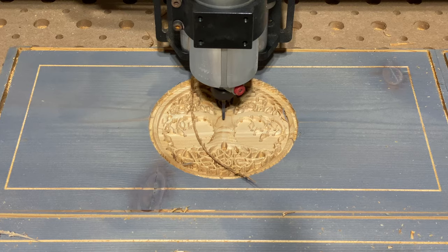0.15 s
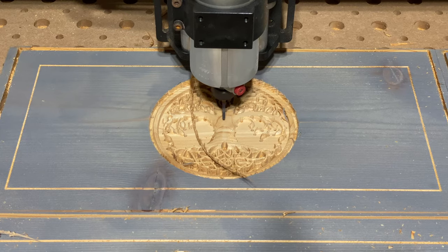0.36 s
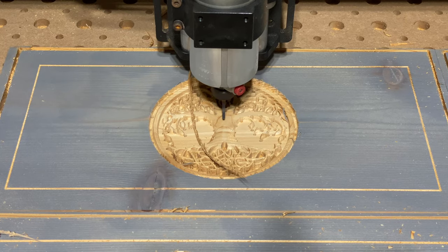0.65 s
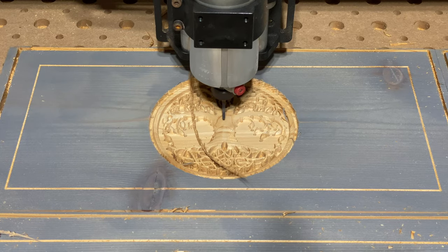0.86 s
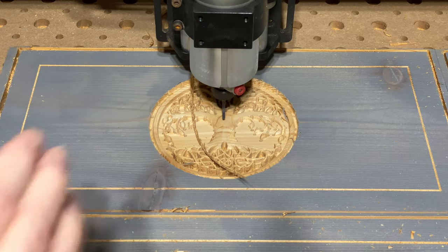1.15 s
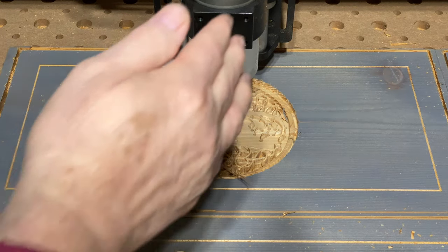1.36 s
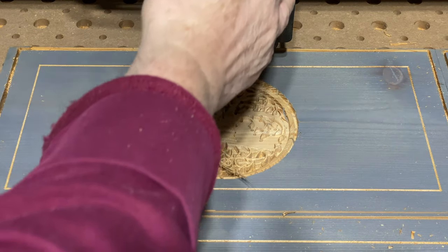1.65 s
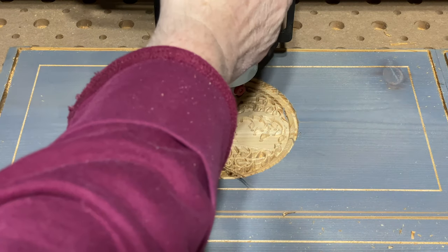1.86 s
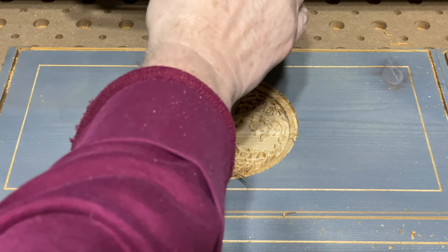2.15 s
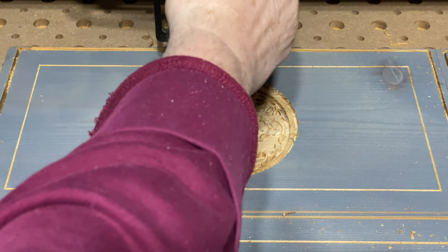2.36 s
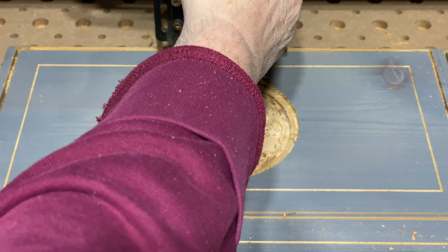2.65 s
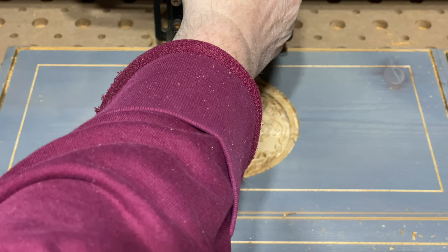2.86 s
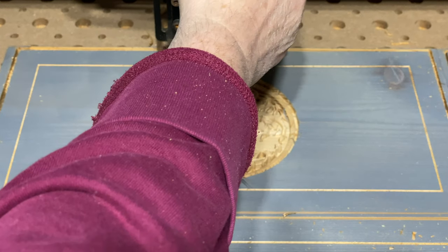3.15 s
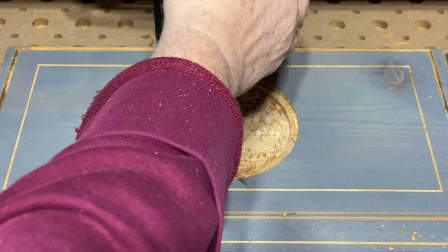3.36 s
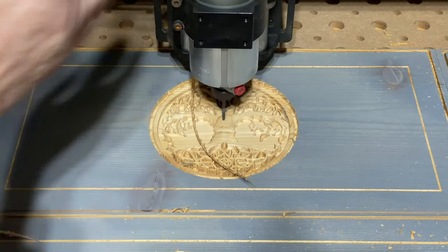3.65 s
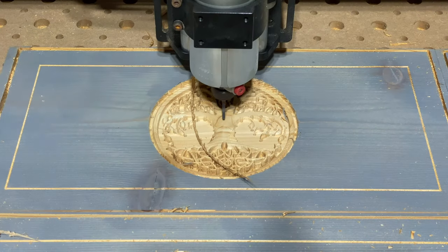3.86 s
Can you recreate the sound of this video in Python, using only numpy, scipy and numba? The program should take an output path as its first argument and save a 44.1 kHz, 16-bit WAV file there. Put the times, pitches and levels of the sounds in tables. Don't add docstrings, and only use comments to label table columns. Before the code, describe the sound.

Close phone pickup of an electric router running freely: buzzing hum, high metallic whine and rushing air, faint then loud, slightly dulled by a passing arm, before power cuts and the pitch sinks and fades.

```python
import sys
import numpy as np
from numba import njit
from scipy import signal
from scipy.fft import rfft, irfft
from scipy.io import wavfile
from scipy.ndimage import uniform_filter1d

SR = 44100
rng = np.random.default_rng(int(sys.argv[2]) if len(sys.argv) > 2 else 0)


def how_loud(loudness_db):
    steps = np.asarray(loudness_db, float) / 20
    return 10 ** steps


def master_out(mix):
    frames = np.transpose(np.atleast_2d(mix))
    ceiling = np.clip(frames, -1, 1)
    pcm = np.round(ceiling * 32767).astype(np.int16)
    wavfile.write(sys.argv[1], SR, pcm)


N = 176400
STEP = 40

SHAFT_HZ = 280.26
# centre in Hz, width in Hz, lift in dB.
BODY = [(911.5, 193, 12), (1185, 300, 6.5), (1567, 600, 2.5), (2290, 540, -2.5), (3096, 730, 5.5),
        (7530, 470, 4.5), (10570, 1030, 4.5)]
# centre in Hz, width in Hz, change # of the sides in dB.
NARROW = [(2030, 980, -31), (6240, 2320, -29), (10900, 1540, -31)]


def walk(rate, count=1):
    hold = max(int(SR / STEP / rate), 8)
    levels = rng.standard_normal((count, N // STEP // 8 + 1))
    steps = np.repeat(levels, hold, axis=1)[:, :N // STEP]
    return 1.3 * uniform_filter1d(uniform_filter1d(steps, hold), hold)


def bumps(hz, table):
    return sum(db * np.exp(-np.log(2) * (2 * (hz - centre) / width) ** 2) for centre, width, db in table)


def curve(hz, table):
    points = np.array(table)
    return np.interp(np.log(hz + 1), np.log(points[:, 0]), points[:, 1])


def notch(hz):
    null_hz, null_width_hz, null_db = 13270, 1350, -32
    null = null_db * np.exp(-(2 * (hz - null_hz) / null_width_hz) ** 6)
    return null + bumps(hz, [(9330, 1630, -3.5)])


def speed(t):
    off_s, slow_per_s, ease_per_s2 = 3.205, .68, .09
    late = np.clip(t - off_s, 0, None)
    return 1 - slow_per_s * late + ease_per_s2 * late ** 2


def coast(t, column):
    # time in seconds, air flow in dB, brush load in dB, bearing load in dB.
    run_down = [
        (3.2, 3, -1.5, 1),
        (3.28, 1.5, -0.5, -3),
        (3.35, -1.5, -1, -3),
        (3.45, -6, -16, 0.5),
        (3.51, -8, -18, -9.5),
        (3.63, -11.5, -12.5, -17),
        (3.685, -12.5, -16, -2),
        (3.74, -14.5, -31, -18),
        (3.85, -17.5, -30, -15.5),
        (4, -22.5, -30, -30),
    ]
    points = np.array(run_down)
    return np.interp(t, points[:, 0], points[:, column])


def hum(share, turn):
    # centre in Hz, width in Hz, left level in dB, right level in dB.
    frame_modes = [(280.8, 11.3, -36, -41), (249.7, 9.3, -28.5, -30), (226.4, 7, -48.5, -40.5),
                   (215, 8.4, -66, -72), (193.6, 7, -48.5, -48), (182, 7.7, -51.5, -52),
                   (166, 7.1, -66, -64)]
    force_db = 12 * np.log2(share) + np.repeat(0.31 * walk(6.88)[0], STEP)
    force = how_loud(force_db) * np.sin(turn)
    lead = np.sin(turn[0] + 2 * np.pi * SHAFT_HZ * np.arange(-SR // 2, 0) / SR)
    total = 0
    for hz, width, left_db, right_db in frame_modes:
        b, a = signal.iirpeak(hz, hz / (1.42 * width), SR)
        ring = np.r_[lead, force]
        for _ in range(3):
            ring = signal.lfilter(b, a, ring)
        total = total + np.sqrt(2) * ring[len(lead):] * how_loud(np.array([[left_db], [right_db]]))
    return total


@njit(fastmath=True)
def tones(turn, order, slip, gains, start, step):
    out = np.zeros((2, len(turn)))
    for k in range(len(order)):
        lag = start[k, 0]
        c, s = np.cos(start[k, 1]), np.sin(start[k, 1])
        for i in range(len(turn)):
            j = i // step
            lag += slip[k, j]
            phase = order[k] * turn[i] + lag
            wave = np.sin(phase)
            out[0, i] += gains[0, k, j] * wave
            if gains[1, k, j] > 3e-6:
                out[1, i] += gains[1, k, j] * (c * np.cos(phase) + s * wave)
    return out


def whine(share, turn):
    # multiple of the shaft speed, centre level in dB, side level in dB.
    shaft_tones = [(2, -63.5, -69), (11, -56, -63), (12, -54.5, -64), (16, -64, -68), (17, -66, -101),
                   (18, -63, -78), (19, -66.5, -92), (22, -62, -94), (23, -62.5, -85), (24, -60.5, -70),
                   (27, -59, -51), (28, -58, -80), (29, -73.5, -76), (30, -58, -71), (31, -62, -54),
                   (32, -61, -55), (34, -86, -82), (37, -59, -79), (39, -71.5, -92), (40, -63, -81),
                   (41, -63, -80), (42, -63, -58), (43, -69, -59), (44, -61, -71), (45, -72, -66),
                   (47, -65, -59), (48, -77, -65), (49, -92, -79), (53, -73, -76), (54, -57, -77)]
    # multiple of the ball rate, centre level in dB, side level in dB.
    ball_tones = [(1, -47.5, -52.5), (2, -58.5, -65), (3, -55.5, -61), (4, -56.5, -64.5), (5, -58, -85),
                  (6, -72, -88), (7, -72, -76), (8, -76, -82), (9, -66, -81), (10, -67, -76),
                  (13, -72, -72), (14, -66, -70)]
    # multiple of the shaft speed, centre level in dB, side level in dB.
    bearing_sidebands = [(4.619, -59, -73), (11.562, -63, -76), (12.853, -67, -79), (17.516, -65, -81),
                         (24.425, -64, -80), (25.63, -63, -79), (29.74, -65, -61), (36.812, -63, -73),
                         (39.05, -62, -78)]
    # centre in Hz, width in Hz, change
    # in dB.
    glide_bands = [(2400, 140, 6), (3320, 120, 4), (3920, 660, -4), (5100, 500, 4.5), (7400, 600, 6),
                   (10700, 800, 10), (14600, 900, 8)]
    balls_per_turn = 4.1045
    faint_db = -80

    rows = [(k, m, s) for k, m, s in shaft_tones]
    listed = [row[0] for row in rows]
    rows += [(k, faint_db, faint_db - 1) for k in range(13, 53) if k not in listed]
    rows += list(bearing_sidebands)
    first_ball = len(rows)
    rows += [(k * balls_per_turn, m, s) for k, m, s in ball_tones]
    count = len(rows)
    order, mid_db, side_db = np.array(rows, float).T[:, :, None]
    ball = (np.arange(count) >= first_ball)[:, None]

    slow = share[::STEP]
    t = np.arange(len(slow)) * STEP / SR
    glide = np.clip(20 * (1 - slow), 0, 1)
    sway = walk(18, count=count)
    drift = walk(24.99, count=count)
    start = rng.uniform(0, 2 * np.pi, (count, 2))

    full = order * SHAFT_HZ
    hz = full * slow
    colour = (bumps(hz, BODY) - bumps(full, BODY)) * np.where(ball & (full > 2000), .3, 1)
    ball_load = coast(t, column=3) + glide * (bumps(hz, glide_bands) - 0.5)
    load = np.where(ball, ball_load, coast(t, column=2))
    wobble_db = 2.5 + 1.8 * glide * np.where(ball, -1, 1)
    db = colour + load + wobble_db * sway - 3 * (full > 14000)

    line_spread_hz = 1.9 * np.sqrt(order) * (1 + 2.48 * glide)
    slip = 2 * np.pi * line_spread_hz * drift / SR
    mid_gain_db = mid_db + db + notch(hz) - (order < 44) * notch(full)
    side_gain_db = side_db + db + bumps(hz, NARROW)
    gains = how_loud(np.array([mid_gain_db, side_gain_db]))
    mid, side = tones(turn, order[:, 0].copy(), slip, gains, start, STEP)
    return np.sqrt(2) * np.array([mid + side, mid - side])


def fan(t, turn):
    # pitch in Hz, level in dB per Hz.
    hiss_mid = [(25, -114), (150, -97), (350, -80), (700, -82), (2000, -78.5), (4000, -84), (9000, -84.5),
                (16000, -97)]
    # pitch in Hz, level in dB per Hz.
    hiss_side = [(25, -117), (150, -105), (600, -81), (1200, -78), (3000, -85.5), (4500, -101.5),
                 (9000, -83), (16000, -93.5)]
    hz = np.arange(N // 2 + 1) * SR / N
    air, other = rfft(rng.standard_normal((2, N))) * np.sqrt(SR / 2)
    mid = air * how_loud(curve(hz, hiss_mid) + bumps(hz, BODY) + notch(hz))

    shared = 0.58 + .2 * (hz > 7000)
    shift = np.pi / 2 - 0.24 * (hz < 1500)
    side = shared * air * np.exp(1j * shift) + np.sqrt(1 - shared ** 2) * other
    side = side * how_loud(curve(hz, hiss_side) + bumps(hz, NARROW)) * (hz < 15200)

    stereo = np.array([mid + side, mid - side])
    flicker = how_loud(0.7 * walk(9.08, count=6))
    throb = 1 + 0.11 * (np.sin(turn) + 0.47 * np.sin(2 * turn))
    octave = np.log2(np.clip(hz / 500, 1, 32))
    total = 0
    for i in range(6):
        band = np.clip(1 - abs(octave - i), 0, 1)
        total = total + irfft(stereo * band, N) * np.repeat(flicker[i], STEP) * throb ** (i > 2)
    return total * how_loud(coast(t, column=1))


def scene():
    # time in seconds, volume in dB, the arm's change of the treble in dB.
    volume_and_arm = [(0, -17, -3.5), (.64, -18.5, -3.5), (.84, -6.5, 1.5), (.95, -1, 0.5), (1.15, 0, 0),
                      (2.2, -1, -0.5), (2.7, -0.5, -1), (3.05, -0.5, -8), (3.3, -1.5, -5), (3.45, -1.5, -5),
                      (3.6, -2, 0), (4, 2.5, 2)]
    echo_s, echo_db = .05, -10
    shade_hz = 5400
    t = np.arange(N) / SR
    share = speed(t)
    turn = 2 * np.pi * np.cumsum(SHAFT_HZ * share) / SR

    tone = whine(share, turn)
    echo = how_loud(echo_db) * np.roll(tone, int(echo_s * SR), axis=1)
    air = tone + echo + fan(t, turn)
    low = signal.sosfiltfilt(signal.butter(2, shade_hz, fs=SR, output="sos"), air)

    times, volume_db, shade_db = np.array(volume_and_arm).T
    volume = how_loud(np.interp(t, times, volume_db))
    shade = how_loud(np.interp(t, times, shade_db))
    return volume * (low + shade * (air - low) + hum(share, turn))


def band_limit(x):
    return signal.sosfilt(signal.butter(12, 16820, fs=SR, output="sos"), x)


def record(dry):
    top_cut = signal.ellip(14, .2, 80, 15700, fs=SR, output="sos")
    heard = signal.sosfilt(top_cut, dry)
    return band_limit(heard)


dry = scene()
out = record(dry)
master_out(out)
```